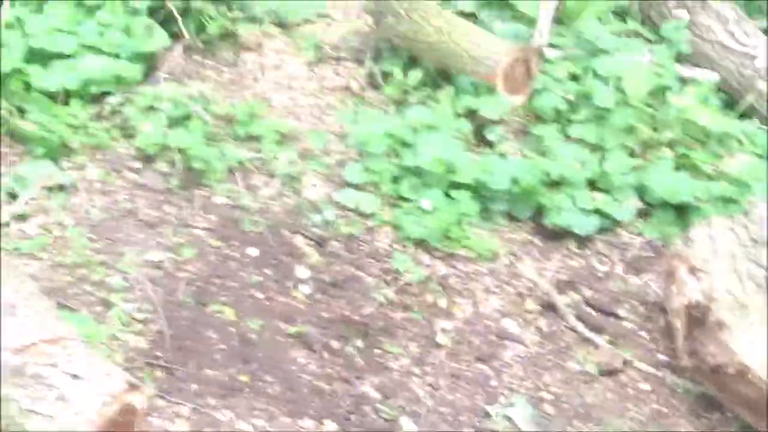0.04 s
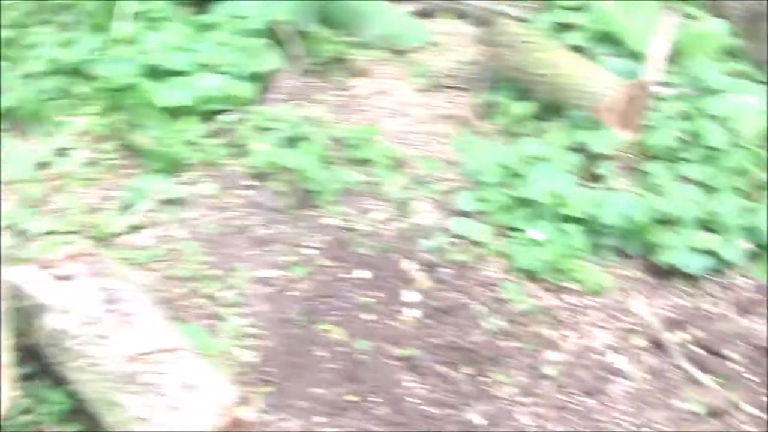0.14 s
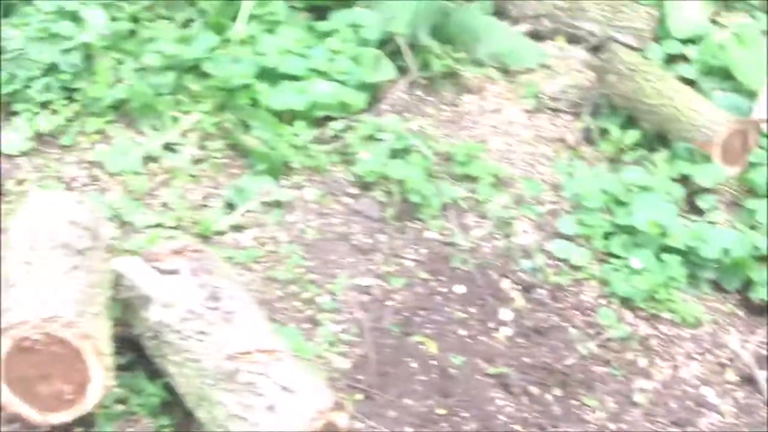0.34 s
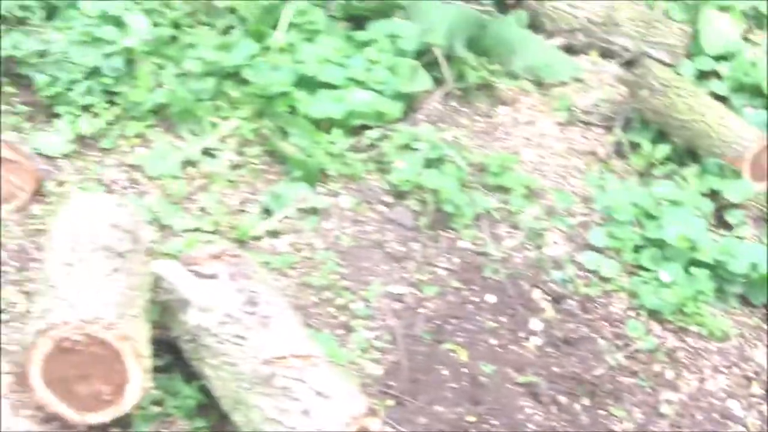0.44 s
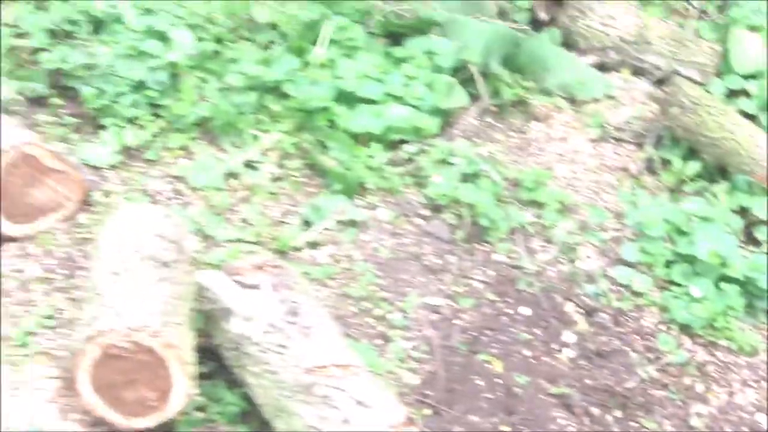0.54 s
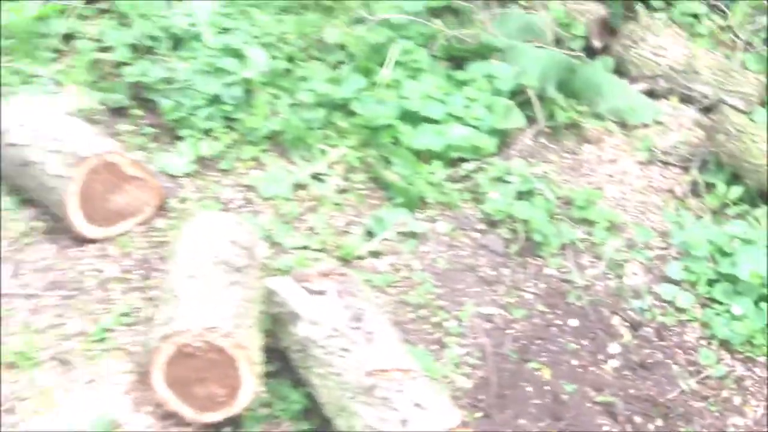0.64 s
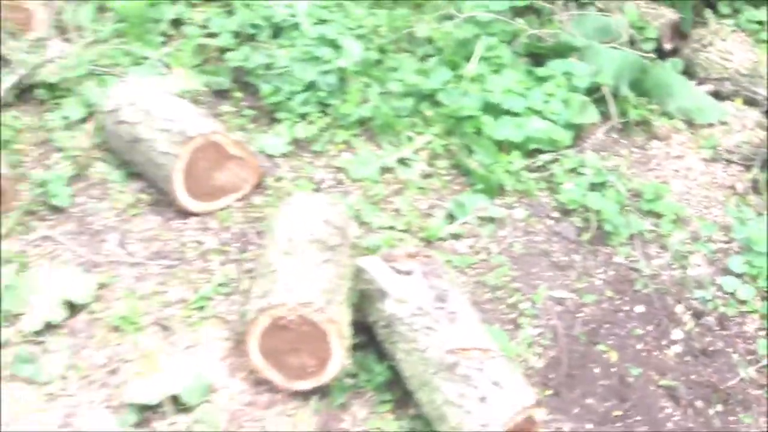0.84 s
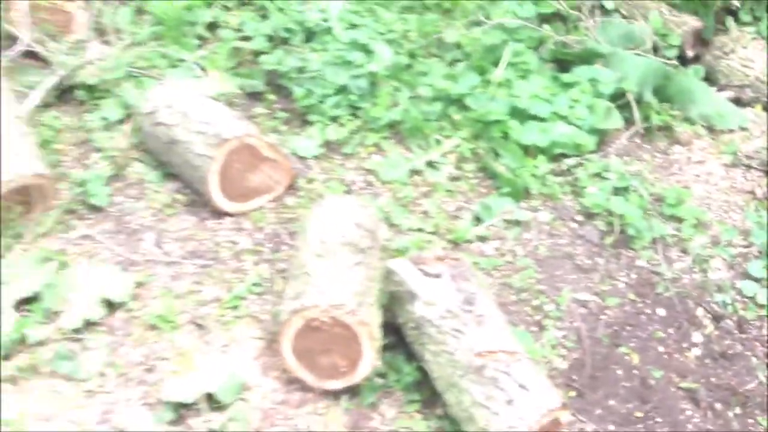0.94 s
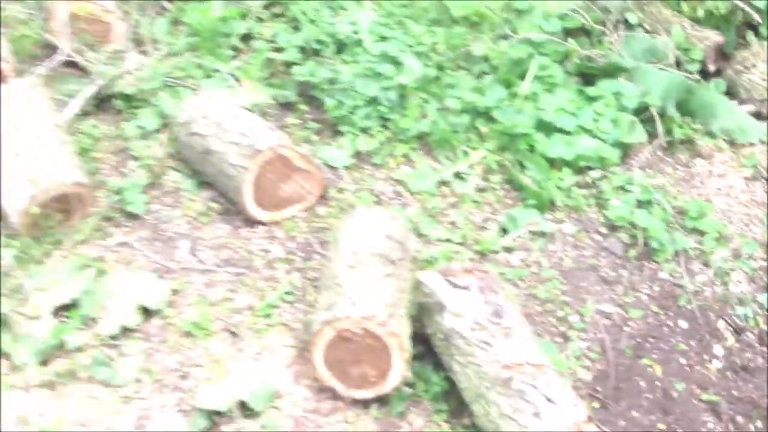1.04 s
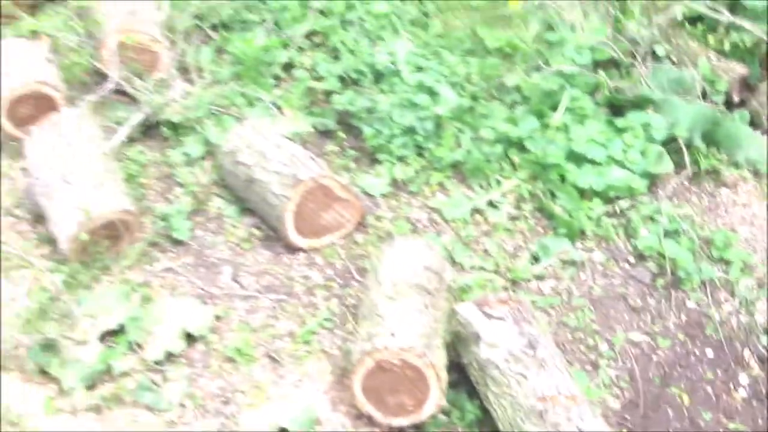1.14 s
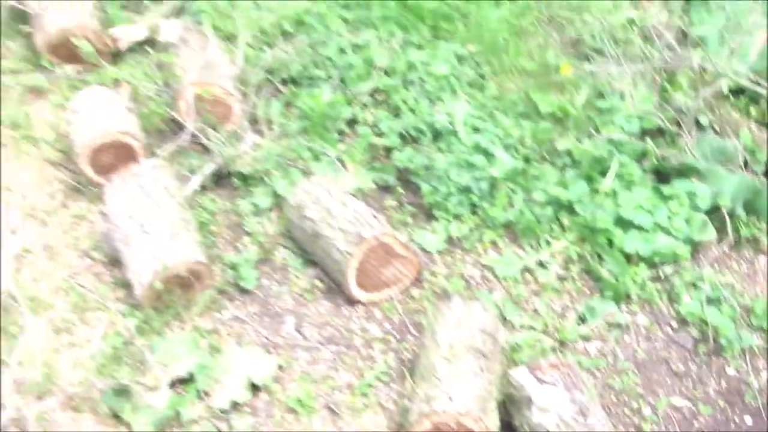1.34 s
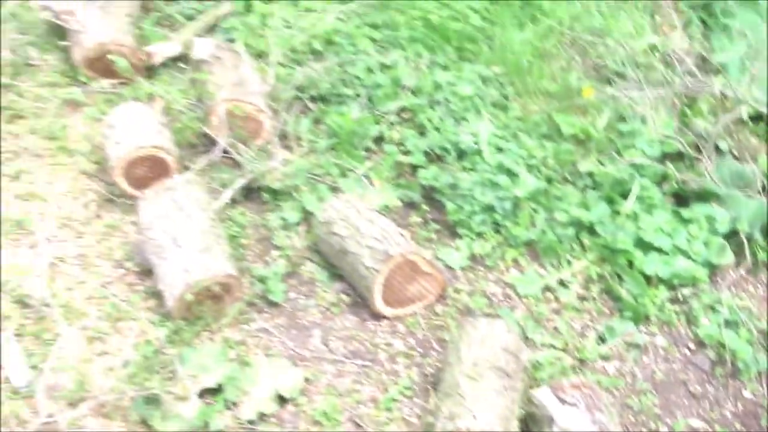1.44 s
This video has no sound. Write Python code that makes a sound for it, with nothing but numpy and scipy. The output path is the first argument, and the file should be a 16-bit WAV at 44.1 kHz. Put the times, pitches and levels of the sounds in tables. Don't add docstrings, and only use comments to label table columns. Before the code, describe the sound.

Outdoors among trees, a hand-held stereo microphone picks up close finger ticks and stirred leaf litter, then a fast frog trill of short nasal pulses, faint distant bird whistles, low traffic hum and a final knock.

```python
import sys
import numpy as np
from scipy import signal
from scipy.fft import rfft, irfft, next_fast_len
from scipy.io import wavfile
from scipy.ndimage import uniform_filter1d, map_coordinates

SR = 44100
rng = np.random.default_rng(int(sys.argv[2]) if len(sys.argv) > 2 else 0)


def to_wav(s):
    ch = np.atleast_2d(s).T
    pcm = np.round(np.clip(ch, -1, 1) * 32767)
    wavfile.write(sys.argv[1], SR, pcm.astype(np.int16))


def nominal_scale(level):
    x = np.asarray(level, float) / 20
    return 10 ** x


N = 66150
TIME = np.arange(N) / SR
SIDES = np.array([[0.5], [-0.5]])


def unit(x):
    return x / np.sqrt(np.mean(x ** 2) + 1e-20)


def along(points, hz):
    f, v = np.transpose(points)
    return np.interp(np.log(hz + 1), np.log(np.abs(f) + 1), v)


def wobble(rate, count):
    return map_coordinates(rng.standard_normal(N // 20), [np.arange(count) * rate / SR])


def phase_of(hz):
    return 2 * np.pi * np.cumsum(hz) / SR


def add_at(out, start_s, sound):
    out[..., round(start_s * SR):][..., :sound.shape[-1]] += sound


def filtered(x, response):
    m = next_fast_len(N + SR // 2)
    return irfft(rfft(x, m) * response(np.fft.rfftfreq(m, 1 / SR)), m)[..., :N]


def placed(x, pan_db, lead):
    return filtered(x * nominal_scale(pan_db * SIDES), lambda hz: np.exp(1j * lead(hz) * SIDES))


# (frequency [Hz], level [dB])
WIDTH = [(60, -7), (180, -4.5), (550, 1.5), (1650, 0.5), (4970, -1.5), (15000, -1.5)]


def rush(spectrum, patchy_db):
    z = signal.stft(rng.standard_normal((2, N)), nperseg=512)[2]
    field = uniform_filter1d(rng.standard_normal(z.shape[1:]), 6, 0)
    field = uniform_filter1d(field, 8, 1)
    pair = signal.istft(z * nominal_scale(patchy_db * unit(field)), nperseg=512)[1][:, :N]
    color = lambda hz: nominal_scale(along(spectrum, hz)) * [hz ** 0, nominal_scale(along(WIDTH, hz))]
    mid, side = filtered(pair, color)
    return np.array([mid + side, mid - side]) / np.sqrt(np.mean(mid ** 2))


# (frequency [Hz], time to fall 60 dB [s])
WOOD_DECAY = [(300, 0.19), (2000, 0.37), (10000, 0.021)]


def wood(x):
    hz, t, z = signal.stft(rng.standard_normal((2, SR // 3)), SR, nperseg=128)
    decay = nominal_scale(-60 * t / along(WOOD_DECAY, hz)[:, None])
    tail = signal.istft(z * decay, SR, nperseg=128)[1]
    delayed = np.pad(x, ((0, 0), (260, 0)))
    return signal.fftconvolve(delayed, tail / np.linalg.norm(tail[0]), axes=1)[:, :N]


# (frequency [Hz], density [dB per Hz])
TRAFFIC = [(15, -56.5), (25, -34.5), (97, -7.5), (162, -8), (228, -0.5), (300, -7), (408, -5.5),
           (1330, -14), (1500, -18.5), (1950, -52), (3300, -120)]


def traffic():
    return nominal_scale(-49.5) * rush(TRAFFIC, patchy_db=1.0)


# (frequency [Hz], density [dB per Hz])
HISS = [(470, -51.5), (800, -5.5), (1520, -6), (1670, -7), (2310, -6.5), (2530, -7), (4030, -26.5),
        (9170, -26), (16400, -36)]


def air_hiss():
    return nominal_scale(-54.5) * rush(HISS, patchy_db=1.5)


# (time [s], level [dB])
RUSTLE = [
    (0.0, -65),
    (0.051, -62.5),
    (0.183, -76.5),
    (0.48, -70),
    (0.868, -69),
    (1.16, -72),
    (1.5, -72),
]
# (frequency [Hz], density [dB per Hz])
LEAVES = [(400, -22), (900, 1.5), (2000, -2.5), (3500, -7.5), (6000, -16.5), (9500, -15.5), (13000, -28),
          (16400, -43)]


def leaf_rustle():
    level_db, growth = 17, 1.85
    s, db = np.transpose(RUSTLE)
    move_db = np.interp(TIME, s, db)
    swell_db = growth * (move_db - db.max()) + 2.3 * wobble(140, count=N)
    return nominal_scale(level_db + db.max() + swell_db) * rush(LEAVES, patchy_db=3.0)


TICK_WET_DB, KNOCK_LOW_HZ = -32, 300
# (frequency [Hz], level [dB], time to fall 60 dB [s])
THUMB = [(350, -6.5, 0.022), (530, 2, 0.018), (714, -2, 0.015), (1020, -2, 0.015), (1410, -7, 0.015),
         (1740, -3, 0.018), (2140, 2, 0.015), (2630, -13.5, 0.0055), (3050, 0, 0.009), (3700, -9, 0.0087),
         (4200, -27, 0.0057), (5400, -11, 0.011), (8220, -13.5, 0.011)]
# (frequency [Hz], level [dB], time to fall 60 dB [s])
NAIL = [(1100, -2.5, 0.014), (1550, -25, 0.0087), (1790, -9.5, .018), (2240, -2, 0.018), (2750, -6, 0.015),
        (3080, -11, 0.013), (3570, -7, 0.015), (4950, -17, .01)]
# (frequency [Hz], level [dB], time to fall 60 dB [s])
STRAP = [(1130, 0.5, 0.028), (1750, -4, 0.021), (2160, -1, 0.018), (2670, -6, .015), (3380, -5, .012)]
# (time [s], level [dB], left over right [dB], rise [s])
FIRM = [
    (.2146, -25, -8, 0.00055),
    (1.3790, -23, -12, .0008),
    (1.3322, -35.5, -11, 0.00081),
    (1.3680, -34, 0, .003),
    (1.3745, -33, 5, .001),
    (0.014, -32.5, -14, 0.00077),
]
# (time [s], frequency [Hz], level [dB], time to fall 60 dB [s])
SNAP = (1.3304, 5800, -45, .006)


def firm_knocks():
    out, t = np.zeros((2, N + SR)), np.arange(SR // 20) / SR
    for (s, db, pan_db, rise), modes in zip(FIRM, (THUMB, NAIL, STRAP, NAIL, NAIL, STRAP)):
        ring = 0
        for k, (hz, mode_db, t60) in enumerate(modes):
            ring = ring + (-1) ** k * nominal_scale(mode_db - 60 * t / t60) * np.sin(2 * np.pi * hz * t)
        onset = 1 - np.exp(-(t / rise) ** 2)
        add_at(out, s, nominal_scale(db + pan_db * SIDES) * ring * onset)
    s, hz, db, t60 = SNAP
    add_at(out, s, nominal_scale(db - 60 * t / t60) * np.sin(2 * np.pi * hz * t))
    low_hz = KNOCK_LOW_HZ / 2
    dry = filtered(out[:, :N], lambda hz: (1j * hz / (low_hz + 1j * hz)) ** 2)
    return dry + nominal_scale(TICK_WET_DB) * wood(dry)


def loose_knock(t, hz):
    spread, focus_db, t60 = 0.903, -13, 0.026
    crack_db, crack_t60, rise = 7, 0.0084, 0.00048
    place = np.linspace(-1, 1, num=9)[:, None]
    pitch = hz * np.exp(spread * place + 0.082 * rng.standard_normal((9, 1)))
    decay_db = 60 * t / t60 * np.sqrt(pitch / hz)
    modes = np.sin(2 * np.pi * (pitch * t + rng.random((9, 1))))
    ring = np.sum(modes * nominal_scale(focus_db * place ** 2 - decay_db), axis=0)
    crack = nominal_scale(crack_db - 60 * t / crack_t60) * rng.standard_normal(len(t))
    return (ring + crack) * (1 - np.exp(-t / rise))


# (time [s], knock level [dB], knock frequency [Hz], click level [dB], left over right [dB])
TICKS = [(.0160, -32.5, 1565, -61, -15.5), (.0250, -32.5, 1900, -48, 6), (0.0383, -38, 1142, -45.5, -11),
         (0.048, -47, 1200, -42.5, 11), (0.096, -40.5, 2110, -75, -14), (0.119, -41.5, 2430, -58, 0),
         (0.13, -42, 2180, -62, -5), (.1610, -40, 1900, -63, -8), (0.2012, -40.5, 1410, -62, -10),
         (0.206, -65, 2010, -54, 9), (0.2148, -29, 1286, -45.5, -8), (0.228, -54, 1990, -61, -17),
         (.4310, -47, 3810, -55.5, -16.5), (0.454, -71, 4030, -71, -3), (.4590, -38.5, 3780, -38.5, 9.5),
         (.8830, -79.5, 3000, -53, 17), (0.9, -60, 3000, -57, -13), (.9500, -58.5, 3000, -52, 11),
         (1.004, -75, 3000, -54, 9.5), (1.3308, -42, 2010, -46.5, -7.5), (1.3345, -44, 1900, -50, -3),
         (1.3743, -47, 2090, -44, 17), (1.3797, -30.5, 2304, -32, -5.5)]
# (frequency [Hz], level [dB])
CLICK = [(2500, -54), (5000, -2.5), (6700, 1.5), (9000, 12.5), (12000, 1), (16000, -12.5)]


def ticks():
    click_t60, click_lag_s, knock_top_hz = 0.013, 0.00005, 3000
    knocks, clicks = np.zeros((2, N + SR)), np.zeros((2, N + SR))
    t = np.arange(SR // 40) / SR
    for s, knock_db, hz, click_db, pan_db in TICKS:
        gain = nominal_scale(pan_db * SIDES)
        add_at(knocks, s, gain * nominal_scale(knock_db - 4.5) * loose_knock(t, hz))
        click = nominal_scale(click_db - 60 * t / click_t60) * rng.standard_normal(len(t))
        add_at(clicks, s, gain * click)

    def click_color(hz):
        return nominal_scale(along(CLICK, hz)) * np.exp(2j * np.pi * hz * click_lag_s * SIDES)

    def body(hz):
        high_pass = (1j * hz / (KNOCK_LOW_HZ + 1j * hz)) ** 2
        return high_pass / (1 + 1j * hz / knock_top_hz - (hz / knock_top_hz) ** 2)

    dry = filtered(knocks[:, :N], body) + filtered(clicks[:, :N], click_color)
    return dry + nominal_scale(TICK_WET_DB) * wood(dry)


# (time [s], length [s], level [dB], pitch [Hz], lead-in over the note [dB])
NOTES = [(0.358, 0.018, -31, 955, -7), (0.396, 0.024, -21.5, 917, -9), (0.441, 0.02, -18.5, 958.6, -6),
         (0.483, 0.02167, -17.5, 947.7, -15), (0.526, 0.023, -20.5, 928, -7), (0.575, 0.017, -26, 872, 7),
         (0.607, 0.03, -23.5, 900, -12.5), (0.658, 0.027, -19, 943, -9.5), (0.706, 0.023, -17.5, 944.4, -1),
         (0.748, 0.021, -18.5, 951.4, -6), (0.796, 0.019, -30.5, 871, 9), (0.843, .025, -19, 905, -6.5),
         (0.891, 0.029, -18, 938.6, -6.5), (0.94, 0.032, -22, 910.4, -1.5), (1.019, 0.026, -24, 876, 2.5),
         (1.08, 0.033, -28, 841.6, 2)]
# (share before the voice flips [1], upper overtones once tight [dB],
# climb factor [1], late side tone [dB])
VOICE = [(0.37, -5, 1.4, -13), (0.396, -8.5, 1.2, -8), (0.419, -5.5, 0.78, -5), (.4, -5.5, 0.96, 2),
         (.42, -5.5, .99, -3), (0.385, -10.5, 0.82, -5), (.45, -8.5, 0.71, 2.5), (0.3, -12.5, 1.22, -12),
         (0.445, -4.5, 0.57, -7), (.42, -3.5, 0.66, -5), (.55, 2, .6, -3), (0.389, -7.5, 0.88, -8),
         (0.36, -8, 0.92, -4.5), (0.391, -0.5, 0.69, -4), (0.455, -1, .8, 2), (0.34, 4.5, 0.6, -13)]
OVERTONES_DB = [-3.5, -2, -3, -8.5, -25.5]


def frog_note(t, length, db, pitch, lead_db, flip, tight_db, climb, side_db):
    start_hz, scoop_sharpness, pitch_share = 644.4, 3.9, 0.6505
    glide_hz_per_s, glide_per_db = 7100, 0.1
    low_scoop, jitter_hz = 0.3, 18
    u = t / length
    slack = np.exp(-(u / flip) ** scoop_sharpness)
    tight = 1 - slack
    glide = climb * glide_hz_per_s * np.clip(1.5 + glide_per_db * (db + 17), 0.25, 2)
    held = pitch + glide * (u - pitch_share) * length
    scoop = (start_hz - held) * slack
    phase = phase_of(held + scoop + jitter_hz * wobble(274, count=len(t)))
    low_phase = phase - phase_of((1 - low_scoop) * scoop)

    attack_s, release_s, break_depth = 0.0023, 0.00042, 0.1
    lead_swell, swell, fade_db = 0.5, 0.18, -6.5
    edges = np.clip(t / attack_s, 0, 1) * np.clip((length - t) / release_s, 0, 1)
    voice_break = 1 - break_depth * 4 * slack * tight
    lead_in = nominal_scale(lead_db) * slack * np.clip(u / flip, 0, 1) ** lead_swell
    main = tight * np.sin(np.pi * np.clip(u, 0, 1)) ** swell * nominal_scale(fade_db * (u - 0.5))
    shape = edges * voice_break * (lead_in + main)

    flutter_hz, slack_flutter, sideband_db = 400, 0.25, 0
    flutter = 2 * np.pi * (flutter_hz * t + rng.random())
    rough = 1 + 0.36 * wobble(1101, count=len(t))
    tight_early, entry_power = 0.87, 1.26
    tone = 0
    for k, overtone_db in enumerate(OVERTONES_DB):
        upper, low = k > 1, k < 2
        fundamental_db = 16.5 * (u - 0.884) * (k == 0)
        level_db = overtone_db + fundamental_db + tight_db * upper * tight ** tight_early
        entry = (1 - slack * low) ** entry_power
        waver = 1 + 0.6 * upper * tight * wobble(458, count=len(t))
        tone = tone + nominal_scale(level_db) * entry * waver * np.sin((k + 1) * (low_phase if low else phase))
    tone = tone + nominal_scale(sideband_db + side_db) * u ** 3 * np.sin(2 * low_phase + flutter)
    tone = tone + slack_flutter * slack * nominal_scale(OVERTONES_DB[2]) * np.sin(3 * phase + flutter)
    return shape * rough * tone


# (frequency [Hz], width [Hz], level [dB])
THROAT = [(1007, 523, -6.5), (1900, 379, 2.5), (2317, 135, -4), (2865, 100, -13), (3730, 530, -23)]


def frog():
    level_db, pan_db, wet_db, left_lead = 4, 4, -19.5, 0.79
    out, t = np.zeros(N), np.arange(SR // 20) / SR
    for (s, length, db, pitch, lead_db), voice in zip(NOTES, VOICE):
        add_at(out, s, nominal_scale(db + level_db) * frog_note(t, length, db, pitch, lead_db, *voice))

    def throat(hz):
        total = 0
        for center, width, db in THROAT:
            band = 1j * hz * width / (center * center - hz * hz + 1j * hz * width)
            total = total + nominal_scale(db) * band ** 2
        return total

    dry = placed(filtered(out, throat), pan_db, lambda hz: left_lead + 0 * hz)
    return dry + nominal_scale(wet_db) * wood(dry)


# (time [s], pitch [Hz], level [dB])
TWITTER = [
    (.620, 4300, -66),
    (.630, 5250, -53),
    (.643, 4700, -52),
    (.657, 3500, -59),
    (.668, 3350, -52),
    (.688, 3650, -53),
    (.700, 4050, -53),
    (.722, 3000, -56),
    (.735, 2800, -85),
]
# (time [s], pitch [Hz], level [dB])
CHIP = [
    (0.764, 5190, -103),
    (0.777, 5100, -65),
    (.792, 5260, -83),
]
# (time [s], pitch [Hz], level [dB])
SEEP = [
    (.91, 6800, -90),
    (.925, 7500, -72),
    (.95, 8300, -72),
    (1.0, 8000, -76),
    (1.06, 7900, -72),
    (1.11, 7200, -75),
    (1.13, 6900, -90),
]


def bird():
    rough_hz, shimmer_db, wet_db = 260, 2.5, 4
    out = 0
    for phrase in (TWITTER, CHIP, SEEP):
        s, hz, db = np.transpose(phrase)
        pitch = np.interp(TIME, s, hz) + rough_hz * wobble(520, count=N)
        out = out + nominal_scale(np.interp(TIME, s, db, -150, -150)) * np.sin(phase_of(pitch))
    shimmer = nominal_scale(shimmer_db * wobble(120, count=N))
    dry = placed(out * shimmer, 1.6, lambda hz: 0 * hz)
    return dry + nominal_scale(wet_db) * wood(dry)


# (time [s], frequency [Hz], level [dB])
DRONE = [
    (.72, 343.8, -85),
    (.85, 350, -52),
    (1.08, 349.8, -49.5),
    (1.2, 330, -83),
]


def engine_drone():
    s, hz, db = np.transpose(DRONE)
    level_db = np.interp(TIME, s, db) + 1.6 * wobble(25, count=N)
    pitch = np.interp(TIME, s, hz) + 12 * wobble(30, count=N)
    return nominal_scale(level_db) * np.sin(phase_of(pitch))


def scene():
    background = traffic() + air_hiss() + leaf_rustle() + engine_drone()
    return background + firm_knocks() + ticks() + frog() + bird()


def top_cut(x):
    return signal.sosfilt(signal.butter(12, 16590, fs=SR, output="sos"), x)


def record(dry):
    port_hz, port_width_hz, port_depth, top_hz = 6710, 500, 0.54, 16400

    def microphone(hz):
        notch = 1 - port_depth * np.exp(-((hz - port_hz) / port_width_hz) ** 2)
        return notch * (hz < top_hz)

    return top_cut(filtered(dry, microphone))


dry = scene()
out = record(dry)
to_wav(out)
```